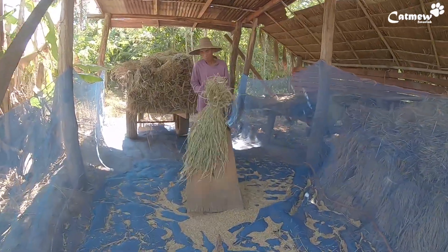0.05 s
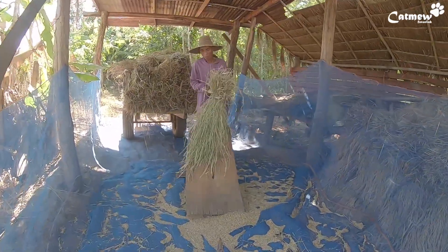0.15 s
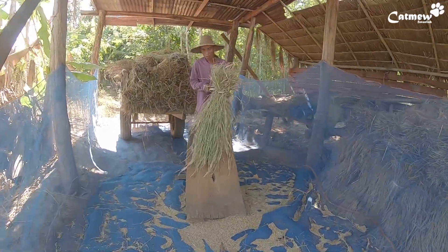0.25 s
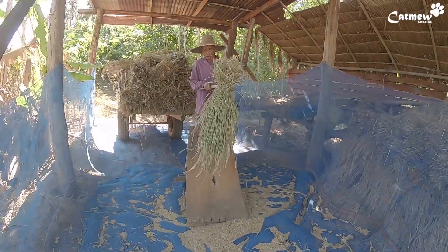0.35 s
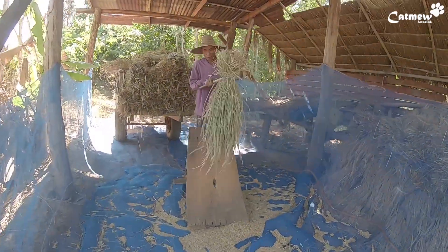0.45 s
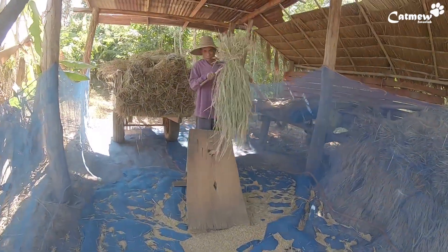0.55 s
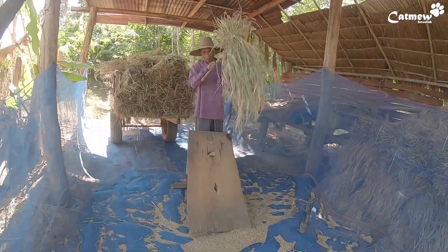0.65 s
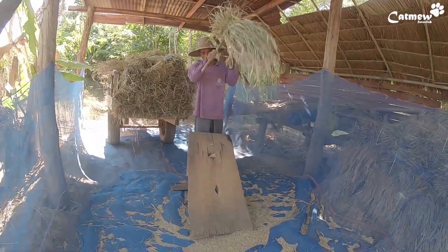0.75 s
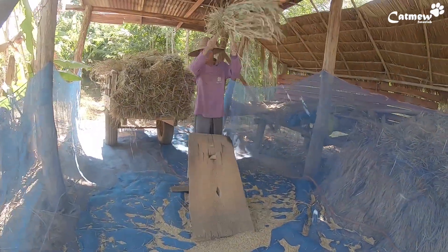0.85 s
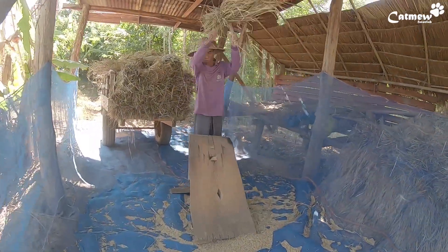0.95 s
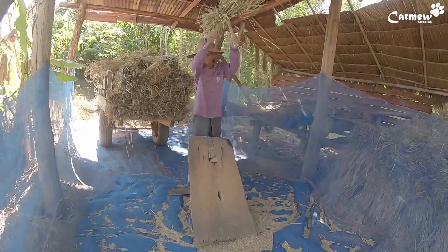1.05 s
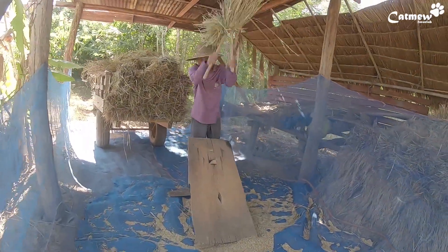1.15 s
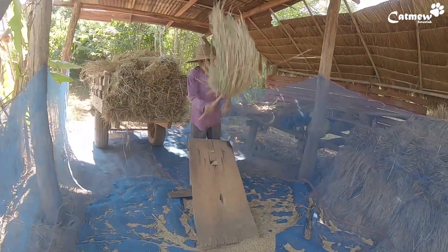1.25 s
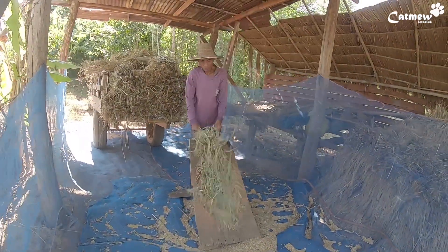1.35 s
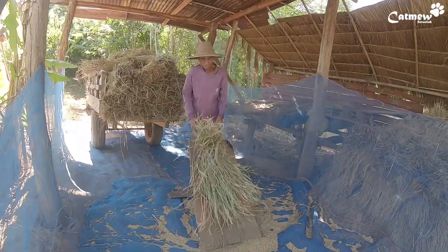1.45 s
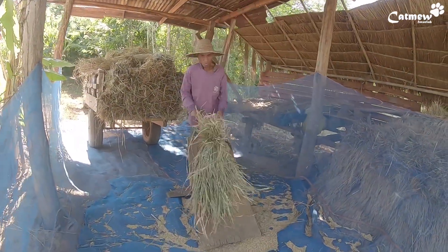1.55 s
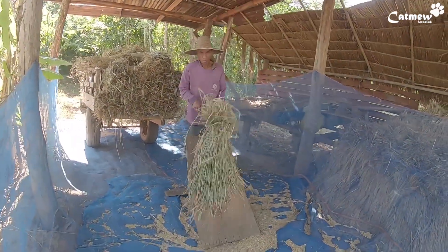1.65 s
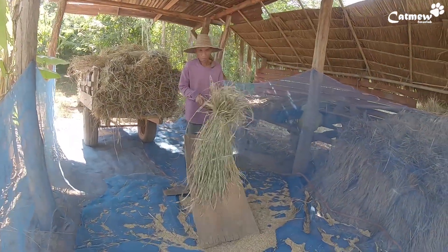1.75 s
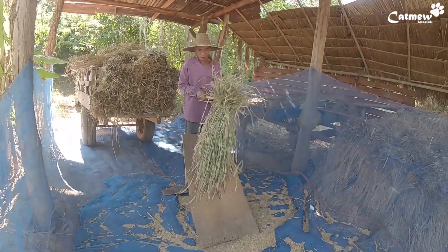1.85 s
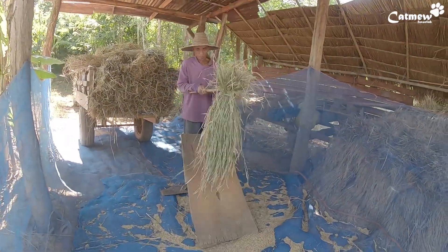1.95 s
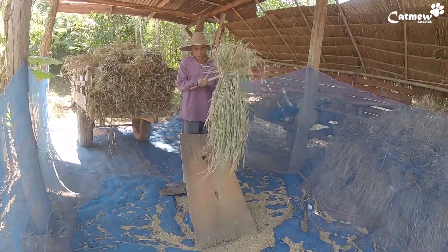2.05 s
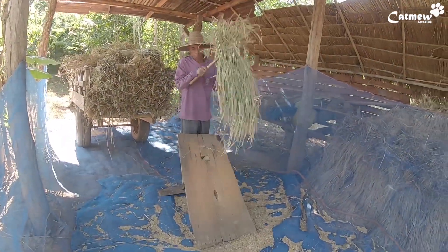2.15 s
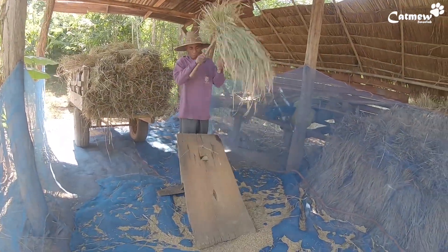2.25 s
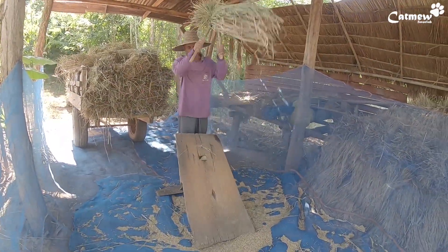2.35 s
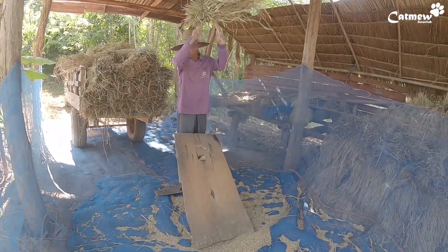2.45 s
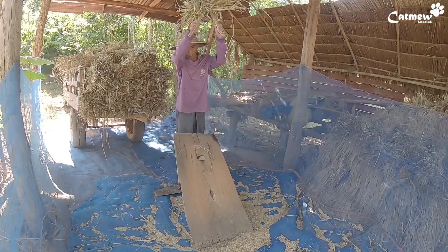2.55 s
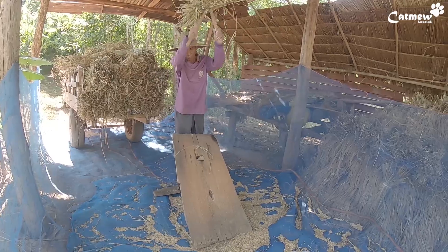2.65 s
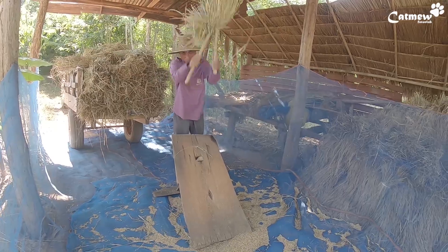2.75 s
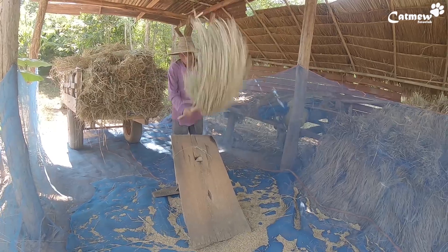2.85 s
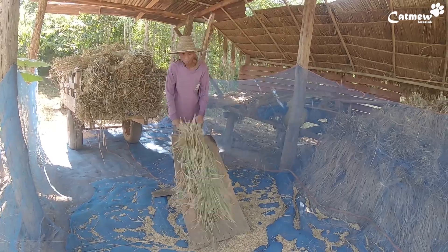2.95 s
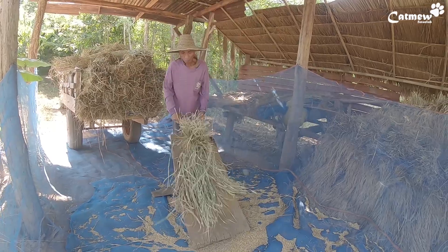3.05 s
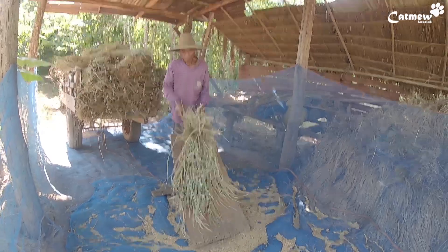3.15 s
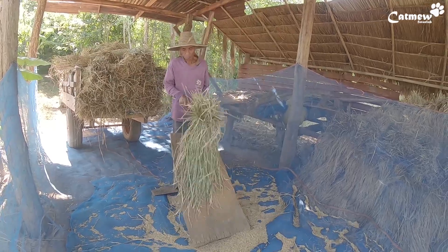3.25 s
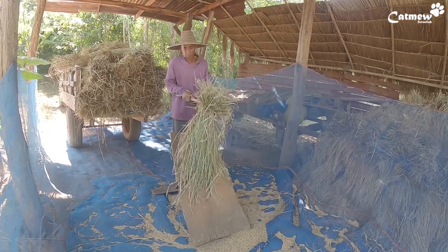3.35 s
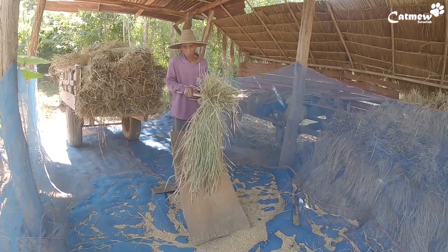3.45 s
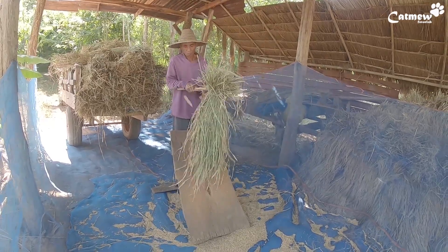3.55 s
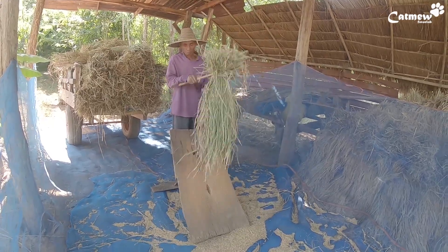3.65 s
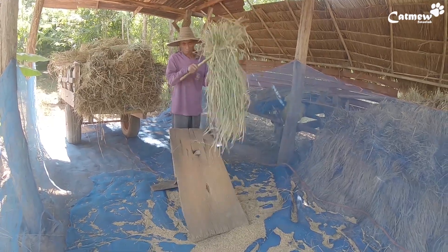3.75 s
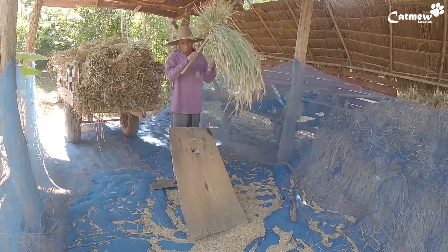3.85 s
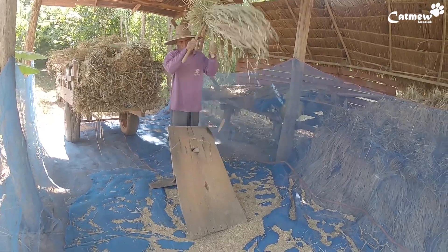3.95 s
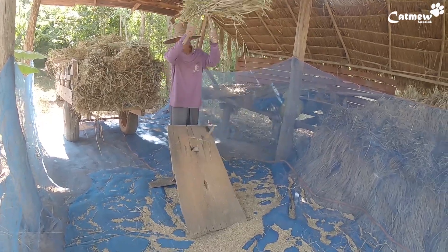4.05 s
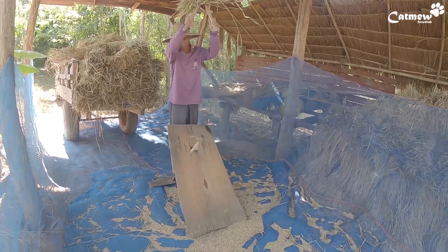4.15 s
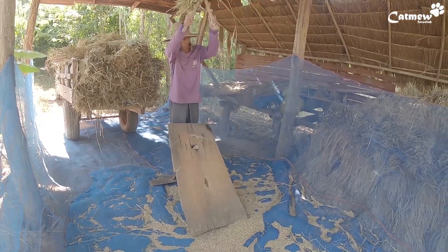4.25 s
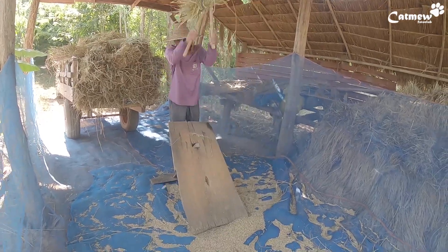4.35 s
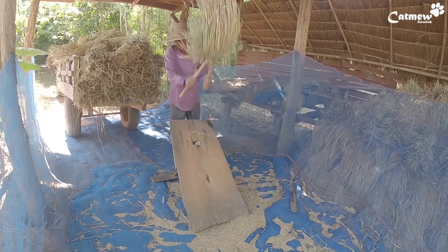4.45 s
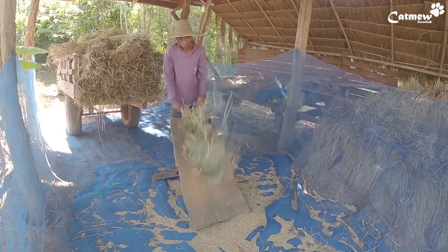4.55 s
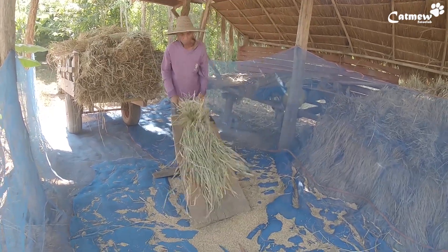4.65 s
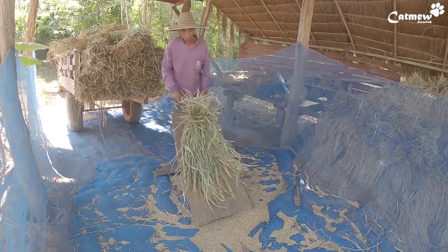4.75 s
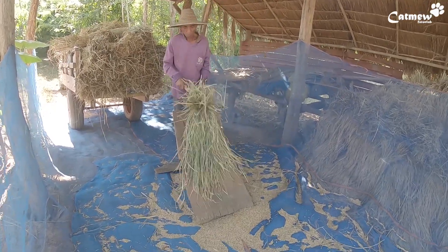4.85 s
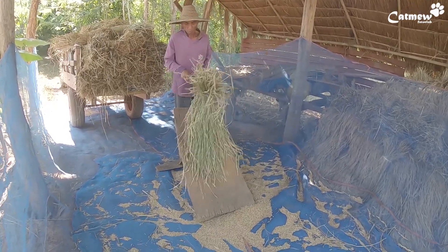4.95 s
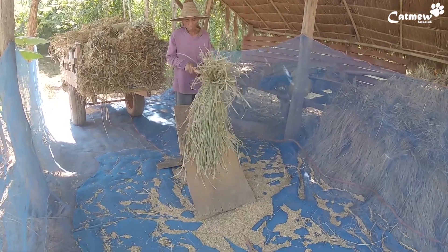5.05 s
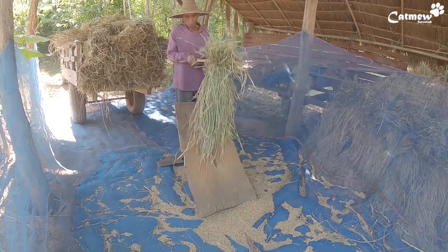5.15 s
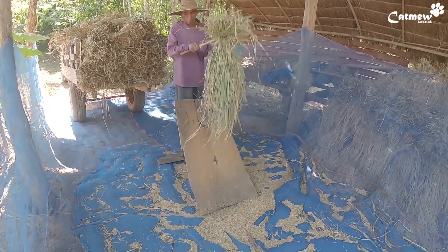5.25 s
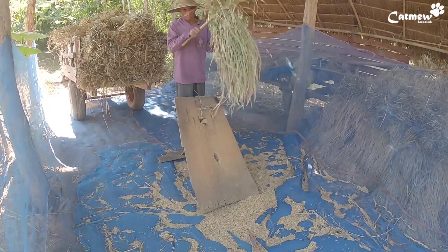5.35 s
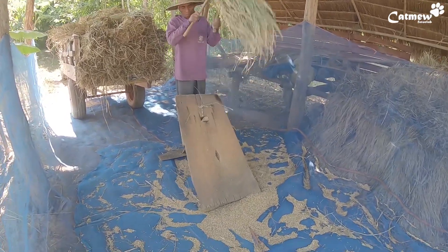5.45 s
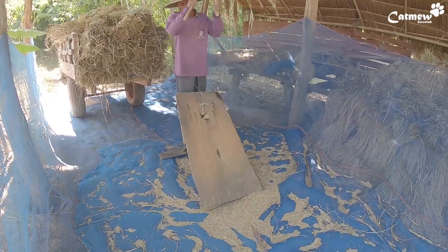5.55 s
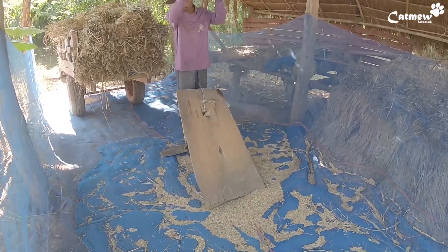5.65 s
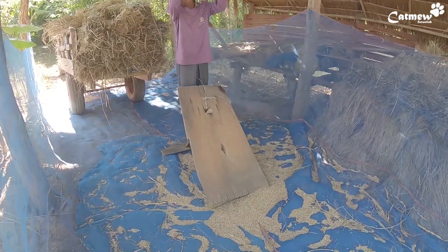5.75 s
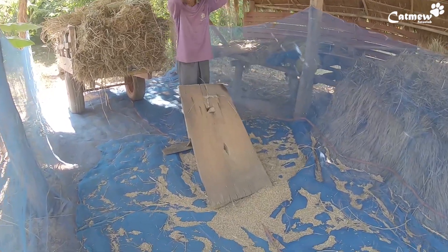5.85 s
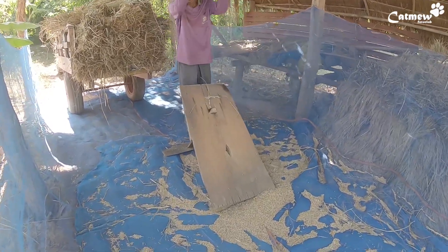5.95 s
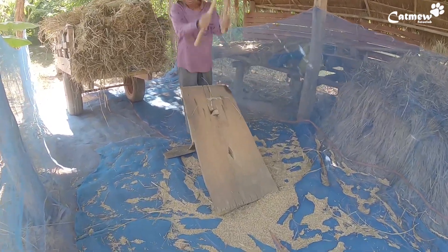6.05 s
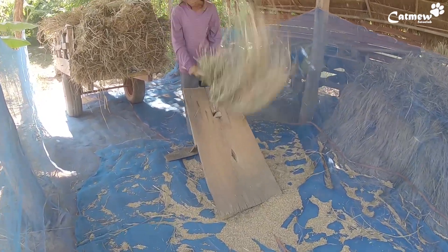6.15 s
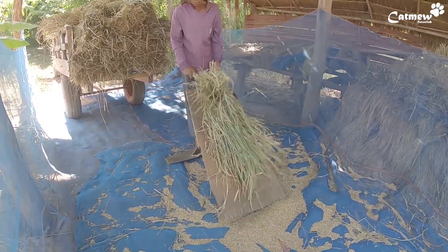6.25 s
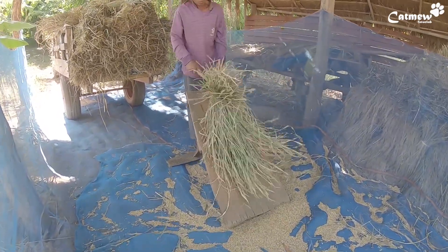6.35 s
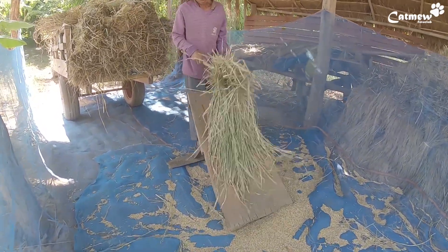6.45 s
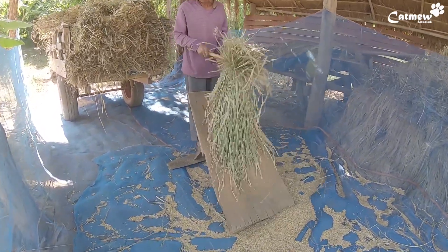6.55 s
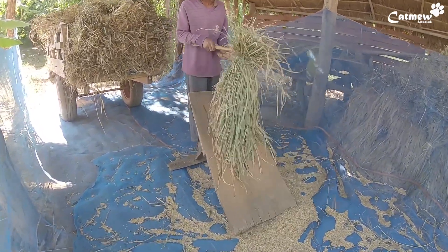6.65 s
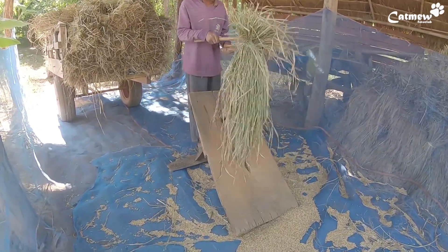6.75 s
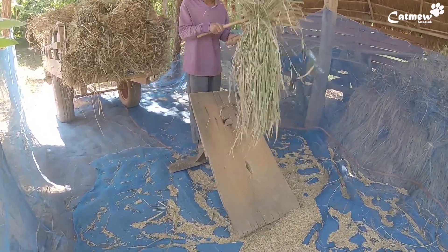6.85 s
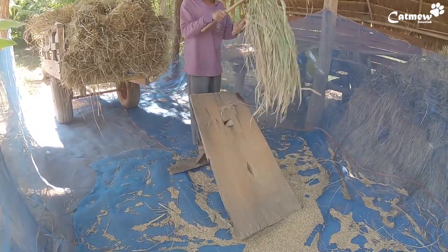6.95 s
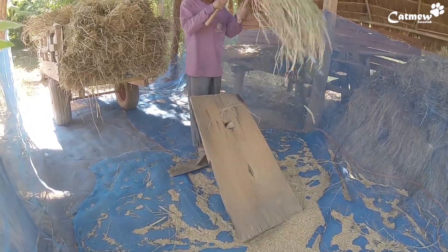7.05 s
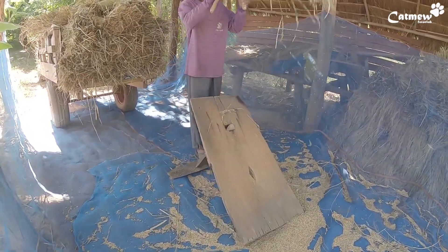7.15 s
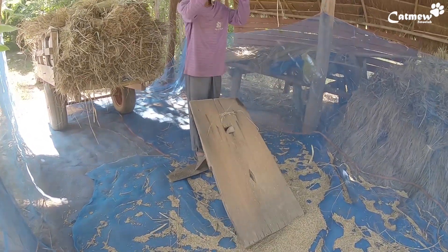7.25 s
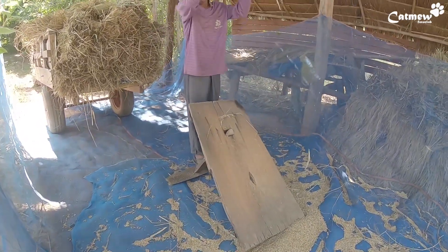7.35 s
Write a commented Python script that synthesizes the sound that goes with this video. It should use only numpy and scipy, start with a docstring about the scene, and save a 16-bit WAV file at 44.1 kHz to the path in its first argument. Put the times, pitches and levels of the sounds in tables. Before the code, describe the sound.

Four heavy, evenly spaced slaps of rice stalks on a booming plank, with straw rustle, light knocks and fingers bumping the microphone.

```python
"""Four booming, splashy slaps: a sheaf of rice is threshed on a leaning wooden board under an open shed.
The straw swishes down from overhead, thousands of stalks and grains strike, and the board booms and rings.
Between blows the sheaf rustles as it is dragged off and lifted, with light knocks and snapping stalks.
Fingers bump and rub the hand-held camera, whose input overloads on the blows; faint open air lies behind."""
import sys
import numpy as np
from scipy import signal
from scipy.fft import rfft, irfft, next_fast_len
from scipy.io import wavfile
from scipy.ndimage import map_coordinates

SR = 44100
rng = np.random.default_rng(int(sys.argv[2]) if len(sys.argv) > 2 else 0)


def unload_audio(sound):
    """Save the sound as a 16-bit wav file, at the path given as the first command line argument."""
    columns = np.transpose(np.atleast_2d(sound))
    # keep every value between -1 and 1, then stretch to whole-number steps
    steps = np.round(np.clip(columns, -1, 1) * 32767)
    wavfile.write(sys.argv[1], SR, steps.astype(np.int16))


N = 326340

# the sheaf hits the board: start_s, slap_db, boom_db, body_db, treble_db, spot_hz, ring_db
BLOWS = [(1.4632, -10, -4, 1, -0.5, 270, -29.5), (3.047, -9.5, -3, 2.5, 1.5, 316, -28.5),
         (4.6842, -8, -1, 3.5, -11, 640, -29), (6.3094, -11, -1.5, 6.5, -0.5, 570, -31)]
# the board's slow bending modes: pitch_hz, signed_strength, t60_s
BOOM_MODES = [(107.5, 0.56, 0.12), (139.8, 0.9, 0.2), (168, -1.27, 0.094), (235.2, -0.19, 0.2),
              (261.2, -0.52, 0.14)]
# its higher, ringing modes: pitch_hz, level_db, t60_s
RING_MODES = [(252.5, 2.5, 0.41), (299.5, -8.5, 0.55), (367, 8.5, 0.4), (423, 1, 0.41), (494, -2.5, 0.42),
              (549.5, 3, 0.33), (603.5, 4, .22), (674, 4.5, 0.36), (775, 2, 0.29), (856, -3, 0.28),
              (994, 0.5, .27), (1085, 7, 0.31), (1211, 5, 0.238), (1395, -6.5, 0.33), (1414, 3, .24)]
# how long the clatter of straw on wood lasts: freq_hz, t60_s
SLAP_DECAY = [(200, 0.28), (700, 0.31), (1500, .27), (3200, 0.22), (6000, 0.18), (12000, 0.16)]

# the sheaf's strokes, one under way at the start, then one a blow: swing_db, drag_db, hoist_db, hoist_after_s
STROKES = [(-44, -41.5, -50, 0.91), (-35.5, -45, -53, 0.77), (-36, -45, -49.5, 0.86),
           (-33.5, -44, -52, .76), (-35.5, -45, -55.5, 0.61)]
# envelopes of a stroke's three moves: attack_s, release_s
SWING_ENVELOPE = (0.19, 0.11)
DRAG_ENVELOPE = (0.12, 0.22)
HOIST_ENVELOPE = (0.32, 0.36)
# ride on the rustle's treble: time_s, gain_db
TREBLE_RIDE = [(0, 0), (.5, -2), (1.3, 3.5), (2.4, 2.5), (3.35, 2.5), (3.75, -9.5), (4.3, -7), (4.65, -6.5),
               (5.5, -7), (6.3, -1), (7.4, 2.5)]
# seed heads brush something overhead, a flash of treble: peak_s, boost_db, width_s
OVERHEAD_BRUSH = (2.408, 8, .025)
# light knocks of stalk ends and wood: start_s, level_db
KNOCKS = [(.146, -40.5), (.259, -42), (.532, -46), (1.052, -42.5), (1.209, -36.5), (2.132, -43),
          (2.743, -30.5), (4.46, -34), (6.022, -47), (6.966, -43)]
# single stalks snap: start_s, gain_db
SNAPS = [(2.1307, -25.5), (5.5628, -36), (5.8734, -33), (6.819, -33)]

# fingers bump the camera: time_s, push_db, push_width_s, wobble_db, ring_db, click_db
FINGER_BUMPS = [(0.695, -50, 0.0026, -61, -68, -40), (3.2738, -7, 0.0031, -12, -3, -9),
                (3.5347, -11, 0.0049, -8.5, -17.5, -58), (3.699, -22.5, 0.0061, -23, -33, -67),
                (3.844, -29, 0.0053, -25.5, -53, -66), (3.994, -36, 0.0092, -23, -39, -66),
                (7.156, -16.5, 0.0024, -34.5, -65, -70), (7.191, -12.5, 0.0024, -57, -65, -70),
                (7.232, -16, 0.0026, -64, -69, -75)]
# a finger slides on the case: start_s, end_s, level_db
FINGER_RUBS = [(2.011, 2.112, -57.5), (2.244, 2.44, -56.5), (3.52, 4.47, -56), (5.692, 5.798, -54)]
# the grip shifts: peak_s, rumble_db, length_s
GRIP_SHIFTS = [(0.34, -47.5, 0.041), (.52, -51, 0.019), (2.425, -42, 0.051), (2.687, -43, 0.031),
               (2.863, -48, 0.11), (3.328, -42, 0.065), (4.62, -31.5, .04), (5.182, -44, 0.053),
               (5.301, -32, .03), (5.709, -30.5, 0.016), (5.767, -41.5, 0.05), (6.13, -42.5, 0.16),
               (6.882, -38, 0.092), (7.01, -41.5, 0.14), (7.22, -35.5, 0.066)]

# tone colours of the noises: freq_hz, density_db
SLAP_SPECTRUM = [(25, -16), (65, -24), (140, -14), (280, -16), (360, -23.5), (650, -19), (900, -23),
                 (1700, -20.5), (2800, -17), (5200, -21.5), (8200, -21.5), (10000, -28.5), (11800, -36.5),
                 (15400, -43.5)]  # straw hitting wood
STRAW_SPECTRUM = [(240, -46), (400, -14.5), (749, -6.5), (808, -7.5), (1260, -3.5), (1440, -3), (2700, 0),
                  (3100, 2.5), (5460, -5), (7880, -4.5), (9050, -9.5), (10100, -7), (11200, -17),
                  (13700, -15), (15400, -26)]  # dry stalks scraping
KNOCK_SPECTRUM = [(210, -42), (350, -26), (498, -3.5), (823, -1.5), (1100, 2), (1360, 1.5), (2370, -1),
                  (2690, -6.5), (4500, -17), (5850, -41), (9900, -120)]  # a hollow knock
RUMBLE_SPECTRUM = [(22, 4), (50, 5.5), (85, -7.5), (150, -2.5), (260, -27), (420, -34.5), (650, -68)]  # the hand holding the camera
SCUFF_SPECTRUM = [(60, -3), (200, 3), (370, -5), (520, -18), (900, -24), (2000, -70)]  # skin on the case
AIR_SPECTRUM = [(18, -12), (30, 9), (92, -16), (177, 11), (284, 1.5), (517, -5), (2980, 1), (7830, -5.5),
                (11300, -20), (13600, -18), (15400, -33)]  # open air

# diffuse sound in the side signal of the two microphone ports: freq_hz, gain_db
SIDE_WIDTH = [(100, -11), (700, 1.5), (2400, -8.5), (4400, -14.5), (8000, -3), (12500, -7)]
# how far direct sound favours the left port: freq_hz, share
LEFT_LEAN = [(100, 0.023), (700, 0.1), (3000, 0.039), (8000, 0.22), (12500, 0.46)]
# spells when the stereo image opens below the top octave too: start_s, end_s
WIDE_SPELLS = [(0, 1.28), (5.45, 5.93)]


def threshing(whoosh_db=-24, whoosh_s=0.039):
    """Each blow: a rush of air swells into the slap of the straw and the boom and ring of the board."""
    out, t = np.zeros((2, N)), np.arange(SR // 2) / SR
    whoosh_spectrum = [(40, -30), (130, -2), (400, -3.5), (1300, -8.5), (3000, -17), (8000, -26)]
    for start, slap_db, boom_db, body_db, treble_db, spot_hz, ring_db in BLOWS:
        wood = amp(boom_db) * board_boom(t) + amp(ring_db) * board_ring(t, spot_hz)
        add(out, start, wood + amp(slap_db) * straw_slap(t, body_db, treble_db))
        whoosh = noise((2, len(t)), whoosh_spectrum) * np.exp(-t[::-1] / whoosh_s)
        add(out, start - t[-1], amp(slap_db + whoosh_db) * whoosh)
    return out


def straw_slap(t, body_db, treble_db, rise_s=0.0015):
    """Stalks land one after another, the bright seed heads last; the clatter dies fastest in the treble."""
    tint = [(900, body_db), (1800, 0.061), (3800, 0.013), (7500, treble_db), (12000, treble_db / 3)]
    hail = coloured(crackle(len(t), per_s=5000, hiss=2.1), SLAP_SPECTRUM)
    hz, age_s, bands = signal.stft(equalised(hail, tint), SR, nperseg=256)
    landing_s = along([(500, .012), (3500, .009), (8000, .024)], hz)[:, None]
    since_landing = age_s - landing_s
    swell_db_per_s = along([(4000, 14), (8000, 242)], hz)[:, None]
    build = amp(np.minimum(since_landing, 0) * swell_db_per_s)
    fade = decay(np.maximum(since_landing, 0), along(SLAP_DECAY, hz)[:, None])
    clatter = signal.istft(bands * fade * build, SR, nperseg=256)[1][:, :len(t)]
    return clatter * (1 - np.exp(-t / rise_s))


def board_boom(t, rise_s=0.0095):
    """The weight of the sheaf bends and twists the whole plank."""
    modes = sum(strength * np.sin(2 * np.pi * hz * t) * decay(t, t60) for hz, strength, t60 in BOOM_MODES)
    return modes * (1 - np.exp(-t / rise_s))


def board_ring(t, spot_hz, spot_db=5, rise_s=0.0072):
    """The board's higher modes ring; the struck spot favours those near spot_hz."""
    ring = 0
    for hz, level_db, t60 in RING_MODES:
        favour_db = spot_db * np.exp(-(np.log(hz / spot_hz) / 0.16) ** 2)
        tone = np.sin(2 * np.pi * (hz * t + rng.random((2, 1))))
        ring += amp(level_db + favour_db) * decay(t, t60) * tone
    return ring * (1 - np.exp(-t / rise_s))


def straw_rustle(gain_db=2, flutter_db=0.44, grain_db=-19, treble_db=4, fizz_db=2, brightening=0.033):
    """Dry stalks scrape each other as the sheaf moves, brighter when it moves fast, and loose grains tick."""
    contacts = crackle(N, per_s=1600, hiss=2.6) + amp(grain_db) * crackle(N, per_s=53, hiss=0)
    straw = coloured(contacts, STRAW_SPECTRUM)
    treble = filtered(straw, lambda hz: 1 / (1 + (5600 / (hz + 1)) ** 6))
    fizz = filtered(treble, lambda hz: 1 / (1 + (10500 / (hz + 100)) ** 20))
    brush_s, brush_db, width_s = OVERHEAD_BRUSH
    crisp_db = np.interp(np.arange(N) / SR, *np.transpose(TREBLE_RIDE))
    crisp_db += brush_db * swell(brush_s, width_s, width_s)
    highs = amp(crisp_db + treble_db) * (treble - fizz) + amp(0.32 * crisp_db + fizz_db) * fizz
    motion = sheaf_motion()
    gain = motion * amp(gain_db + flutter_db * drift(45))
    return gain * (straw - treble + unit(motion) ** brightening * highs)


def sheaf_motion(held_db=-54, opening_stroke_s=-.21, drag_after_s=.28, hover_before_s=0.37, hover_db=-2):
    """How hard the straw is stirred: each stroke swings it down, drags it off the board and hoists it."""
    power, lull_db = amp(held_db) ** 2, 0  # stalks creak in the hands all the time
    blow_times = [opening_stroke_s] + [blow[0] for blow in BLOWS]
    for blow_s, (swing_db, drag_db, hoist_db, hoist_after_s) in zip(blow_times, STROKES):
        swing = amp(swing_db) * swell(blow_s, *SWING_ENVELOPE, shape=1.19)
        drag = amp(drag_db) * swell(blow_s + drag_after_s, *DRAG_ENVELOPE, shape=1)
        hoist = amp(hoist_db) * swell(blow_s + hoist_after_s, *HOIST_ENVELOPE)
        power += swing ** 2 + drag ** 2 + hoist ** 2
        lull_db += hover_db * swell(blow_s - hover_before_s, 0.18, 0.18)  # the sheaf hangs overhead
    return np.sqrt(power) * amp(lull_db)


def knocks_and_snaps(knock_t60=.085, snap_t60=0.079, snap_trim_db=-11):
    """Stalk ends and wood give short hollow knocks; single stalks break with a bright crack."""
    out, t = np.zeros((2, N)), np.arange(SR // 5) / SR
    for start, level_db in KNOCKS:
        add(out, start, amp(level_db) * noise((2, len(t)), KNOCK_SPECTRUM) * decay(t, knock_t60))
    for start, gain_db in SNAPS:
        crack = noise((2, len(t)), [(800, -16), (4500, 1), (8500, -7), (12000, -20)])
        add(out, start, amp(gain_db + snap_trim_db) * crack * decay(t, snap_t60))
    return out


def finger_bumps(case_hz=1430, wobble_hz=165, wobble_s=0.0024, scuff_s=0.0094, lead_s=0.0024, cut_hz=38):
    """A finger ticks on the plastic case, then its pad pushes and scuffs and the camera wobbles."""
    click_spectrum = [(300, -35), (1800, 1), (3000, -25), (4200, -7), (4800, 2), (5400, -10),
                      (7800, -2), (10000, -47), (15000, -55)]
    tock_spectrum = [(300, 17), (1000, -13.5), (1600, 7.5), (2300, -53), (6000, -63.5), (12000, -75)]
    thuds, ticks, t = np.zeros(N), np.zeros(N), np.arange(SR // 10) / SR
    from_peak = t - t[-1] / 2
    phase = 2 * np.pi * wobble_hz * from_peak
    wobble = (np.cos(phase) + amp(-11) * np.cos(2 * phase)) / np.cosh(from_peak / wobble_s)
    ring = np.sin(2 * np.pi * case_hz * t) * decay(t, t60=0.018)
    for time_s, push_db, width_s, wobble_db, ring_db, click_db in FINGER_BUMPS:
        push = np.exp(-(from_peak / width_s) ** 2 / 2)
        scuff = amp(-16) * noise(len(t), SCUFF_SPECTRUM) * np.exp(-np.abs(from_peak) / scuff_s)
        add(thuds, time_s - t[-1] / 2, -amp(push_db) * push - amp(wobble_db) * (wobble + scuff))
        click = noise(len(t), click_spectrum) * decay(t, t60=0.0081)
        tock = amp(-6) * noise(len(t), tock_spectrum) * decay(t, t60=0.04)
        add(ticks, time_s - lead_s, amp(ring_db) * (ring + tock) + amp(click_db) * click)
    ticks = filtered(ticks, lambda hz: 1 / (1 + (hz / 9000) ** 12))
    # the low cut makes each push swing back
    return ticks + filtered(thuds, lambda hz: hz ** 2 / (hz ** 2 - cut_hz ** 2 - 1.3j * hz * cut_hz))


def hand_on_case(rest_db=-75, tight_db=-59.5, tighten_s=2.1, unsteady_db=2, case_hz=1400, width_hz=190):
    """The hand rumbles, more as it tightens or shifts; sliding fingers scuff and set the case resonating."""
    pressure = np.zeros(N)
    for start, end, level_db in FINGER_RUBS:
        add(pressure, start, amp(level_db) * signal.windows.tukey(round((end - start) * SR), .25))
    hold = amp(np.where(np.arange(N) / SR < tighten_s, rest_db, tight_db))
    shifts = sum(amp(db) * swell(peak, 0.65 * length, length, shape=1.2) for peak, db, length in GRIP_SHIFTS)
    rumble = (hold + shifts) * noise((2, N), RUMBLE_SPECTRUM)
    scuff = amp(1) * pressure * noise((2, N), SCUFF_SPECTRUM)
    friction = rng.standard_normal((2, N))
    resonance = filtered(friction, lambda hz: 1 / (1 + (2 * (hz - case_hz) / width_hz) ** 2))
    return amp(unsteady_db * drift(16)) * (rumble + scuff) + pressure * unit(resonance)


def open_air(level_db=-55):
    """A faint, steady bed of outdoor noise."""
    return amp(level_db) * noise((2, N), AIR_SPECTRUM)


def microphone_ports(pair, wide_db=1, narrow_db=-31, slope_db_per_s=47):
    """Direct and diffuse rows become left and right at two close ports; only the top octave stays wide."""
    mid, diffuse = pair
    side = equalised(diffuse, SIDE_WIDTH) + filtered(mid, lambda hz: along(LEFT_LEAN, hz))
    top = filtered(side, lambda hz: 1 / (1 + (10300 / (hz + 100)) ** 20))
    t = np.arange(N) / SR
    from_spell_s = np.min([np.abs(t - np.clip(t, start, end)) for start, end in WIDE_SPELLS], axis=0)
    width = amp(np.maximum(wide_db - slope_db_per_s * from_spell_s, narrow_db))
    side = top + width * (side - top)
    return np.array([mid + side, mid - side])


def amp(db):
    """Decibels as a gain."""
    return 10 ** (np.asarray(db) / 20)


def unit(x):
    """x at rms 1."""
    return x / np.sqrt(np.mean(x ** 2) + 1e-20)


def decay(t, t60):
    """A tail that falls 60 dB in t60 seconds."""
    return amp(-60 * t / t60)


def swell(peak_s, attack_s, release_s, shape=2):
    """A gain that rises to 1 at peak_s and falls again; shape 1 is pointed, 2 is round."""
    t = np.arange(N) / SR - peak_s
    return np.exp(-np.minimum(np.abs(t / np.where(t < 0, attack_s, release_s)), 20) ** shape)


def drift(rate):
    """A smooth random curve, rate knots a second."""
    return map_coordinates(rng.standard_normal(int(N * rate / SR) + 4), [np.arange(N) * rate / SR])


def along(points, hz):
    """A curve through (freq_hz, value) points on a log frequency axis."""
    freqs, values = np.transpose(points)
    return np.interp(np.log(hz + 1), np.log(freqs + 1), values)


def filtered(x, response):
    """x through a filter whose gain is response(hz)."""
    n = x.shape[-1]
    padded = next_fast_len(n + SR // 4)
    return irfft(rfft(x, padded) * response(np.fft.rfftfreq(padded, 1 / SR)), padded)[..., :n]


def equalised(x, curve):
    """x through an EQ of (freq_hz, gain_db) points."""
    return filtered(x, lambda hz: amp(along(curve, hz)))


def coloured(x, spectrum):
    """x shaped by a spectrum, at rms 1."""
    return unit(equalised(x, spectrum))


def noise(shape, spectrum):
    """Coloured noise at rms 1."""
    return coloured(rng.standard_normal(shape), spectrum)


def crackle(n, per_s, hiss):
    """Two rows of tiny contacts of random size over a blur of countless smaller ones."""
    hits = rng.random((2, n)) < per_s / SR
    return unit(unit(hits * rng.standard_normal((2, n))) + hiss * rng.standard_normal((2, n)))


def add(out, start_s, sound):
    """Mix a sound in at start_s."""
    i = max(round(start_s * SR), 0)
    out[..., i:i + sound.shape[-1]] += sound[..., :N - i]


def scene():
    """Threshing, hand noise and open air in stereo, with the finger bumps dead centre."""
    air = open_air()
    sheaf = threshing() + straw_rustle() + knocks_and_snaps()
    return microphone_ports(sheaf + hand_on_case() + air) + finger_bumps()


def record(dry, band_limit_hz=15700):
    """The input rounds off the highest peaks and keeps nothing above its band limit."""
    saturated = dry / (1 + np.abs(dry) ** 6) ** (1 / 6)
    return filtered(saturated, lambda hz: hz < band_limit_hz)


dry = scene()
out = record(dry)
unload_audio(out)
```